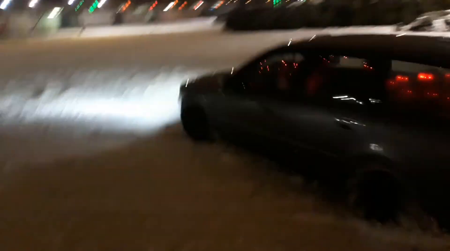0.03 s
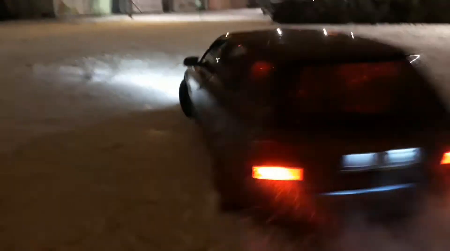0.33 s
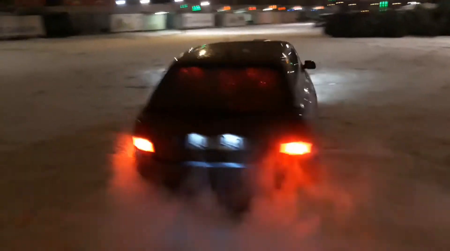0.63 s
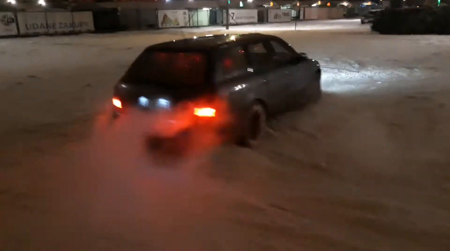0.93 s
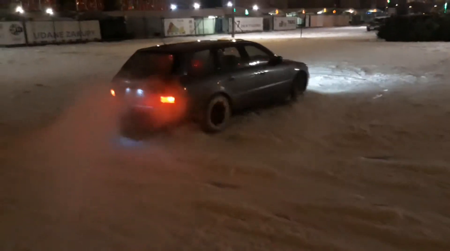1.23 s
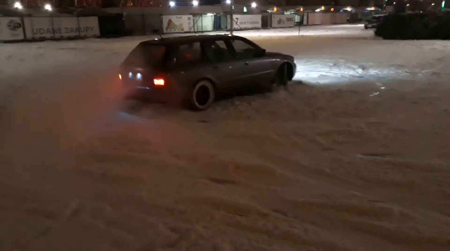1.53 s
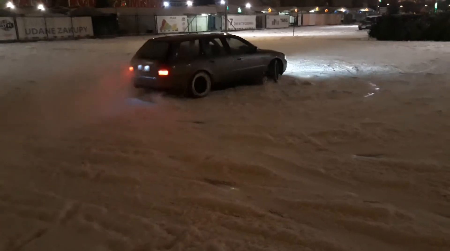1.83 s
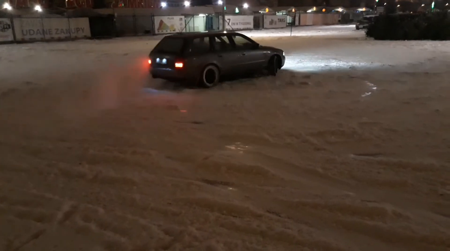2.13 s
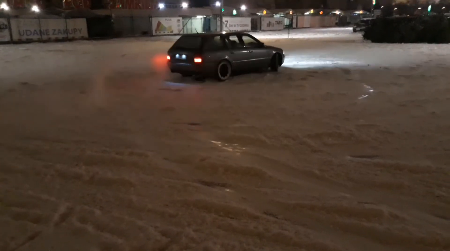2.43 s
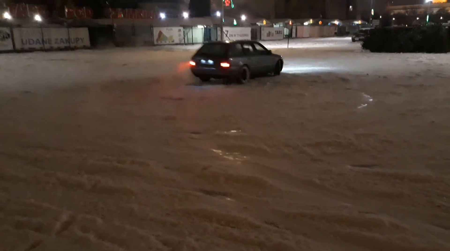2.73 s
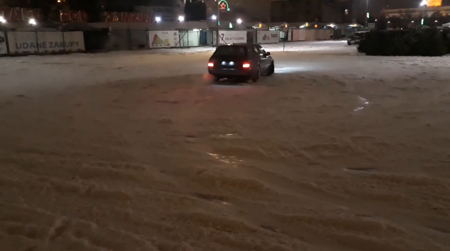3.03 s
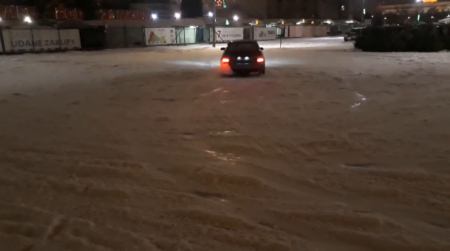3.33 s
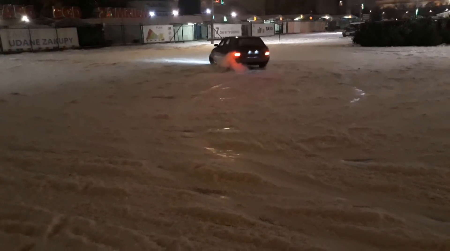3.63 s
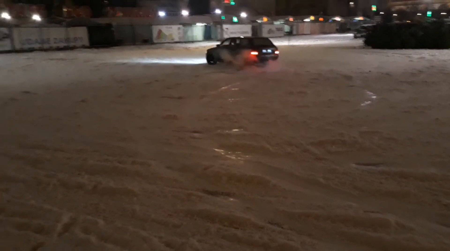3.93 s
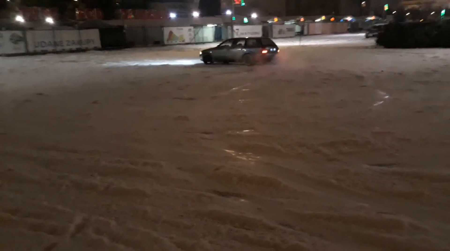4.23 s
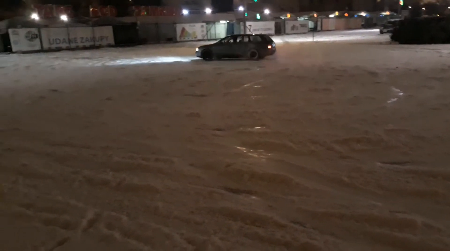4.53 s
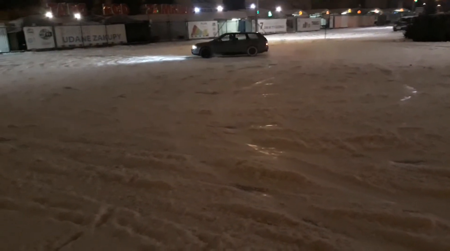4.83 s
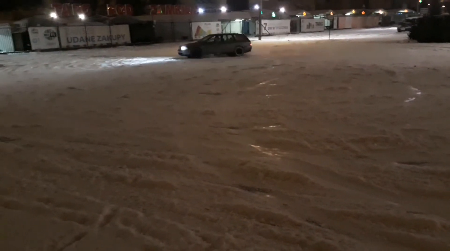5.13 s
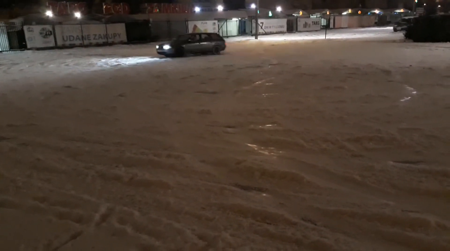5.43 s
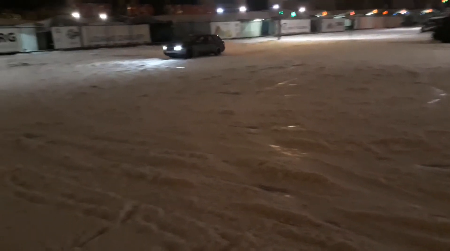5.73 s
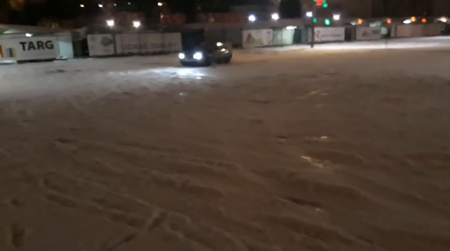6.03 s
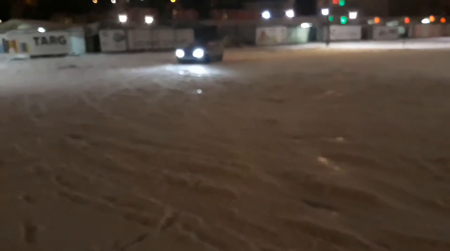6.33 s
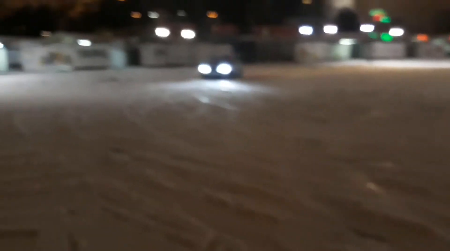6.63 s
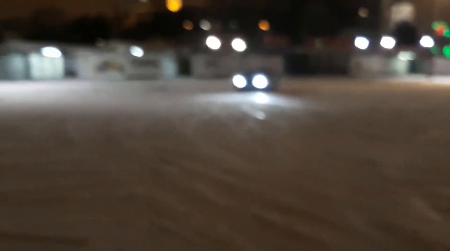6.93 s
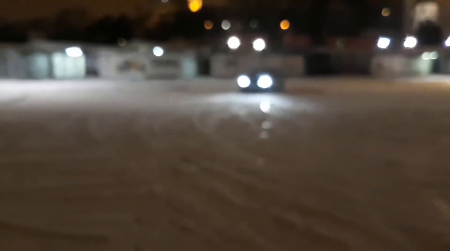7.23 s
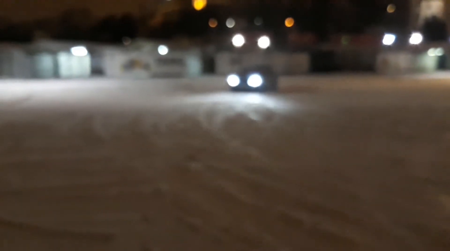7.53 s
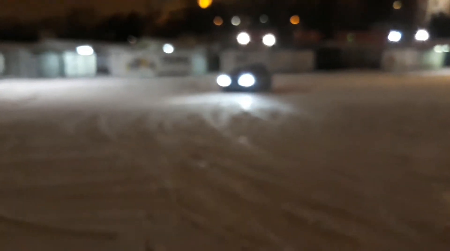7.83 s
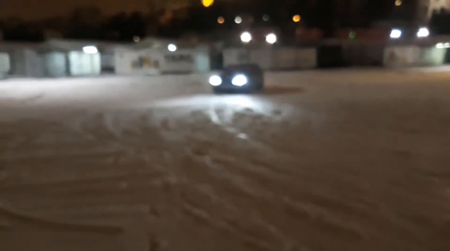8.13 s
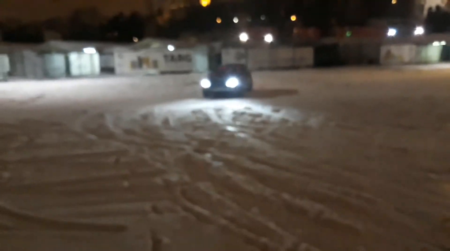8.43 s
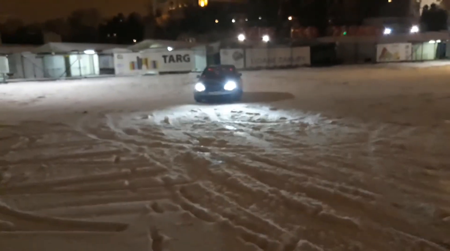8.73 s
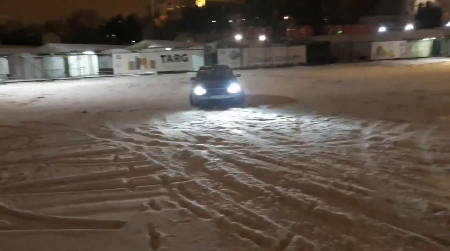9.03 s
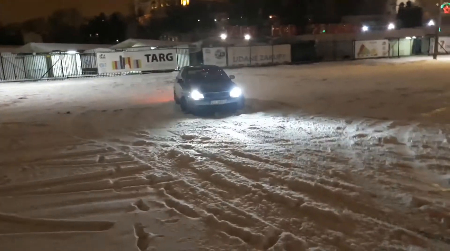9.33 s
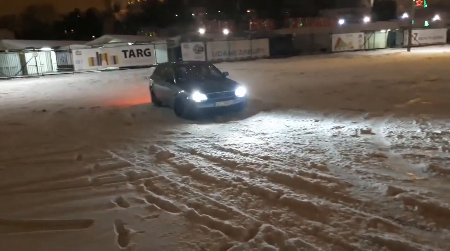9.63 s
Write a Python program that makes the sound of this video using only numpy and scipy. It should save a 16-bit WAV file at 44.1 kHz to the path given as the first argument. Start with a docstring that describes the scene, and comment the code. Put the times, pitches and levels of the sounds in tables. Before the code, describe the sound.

A car revs loudly close by, spins its tyres on snow, then moves off with exhaust pops and turns back in bursts of throttle.

```python
"""A snowy car park at night: an estate car pulls away close by, drifts, turns and comes back.
Four bursts of throttle set the revs. Uneven firings drone and rumble in the exhaust, gas roars in time
with them and the spinning tyres throw snow. A hard lump knocks on the underbody, unburnt fuel pops and
lumps of snow crunch. As the nose turns to us the engine bay hisses, and faint high whistling bands
glide up and down. Low buildings give a faint echo."""
import sys
import numpy as np
from scipy import signal
from scipy.fft import rfft, irfft
from scipy.io import wavfile

SR = 44100
rng = np.random.default_rng(int(sys.argv[2]) if len(sys.argv) > 2 else 0)


def master(y):
    """Save y as 16-bit WAV."""
    cut = np.clip(np.atleast_2d(y).T, -1, 1)
    pcm = np.round(cut * 32767)  # scale
    wavfile.write(sys.argv[1], SR, pcm.astype(np.int16))


N = 432180
TIME_S = np.arange(N) / SR


def undb(db):
    """Decibels to gain."""
    return np.exp(np.asarray(db) * (np.log(10) / 20))


def unit(x):
    """Scale to rms 1."""
    return x / np.sqrt(np.mean(x ** 2))


def curves(table):
    """Table columns, linearly interpolated over time."""
    times_s, *columns = np.transpose(table)
    return [np.interp(TIME_S, times_s, column) for column in columns]


def noise():
    """White noise."""
    return rng.standard_normal(N)


def walk(hz):
    """Smooth random drift, rms 1."""
    step = max(int(SR / (2 * hz)), 2)
    knots = rng.standard_normal(N // step + 2)[:, None]
    blend = np.sin(np.pi / 2 * np.arange(step) / step) ** 2
    return unit((knots[:-1] + np.diff(knots, axis=0) * blend).ravel()[:N])


def colour(x, spectrum):
    """Filter by (Hz, dB) points; rms 1."""
    hz, db = np.transpose(spectrum)
    bins_hz = np.arange(1, N // 2 + 2) * SR / N
    gain_db = np.interp(np.log(bins_hz), np.log(hz), db, left=-70, right=min(db[-1], 0))
    return unit(irfft(rfft(x) * undb(gain_db), N))


def ring(x, hz, width_hz):
    """One resonance, gain 1 at centre."""
    return signal.lfilter(*signal.iirpeak(min(hz, .45 * SR), hz / width_hz, SR), x)


def ring_twice(x, hz, width_hz):
    """Two equal resonances in series: steeper skirts."""
    return ring(ring(x, hz, width_hz), hz, width_hz)


def bump(x, centre, width, db):
    """Bell curve in x, db at centre."""
    return db / (1 + ((x - centre) / width) ** 2 / 2) ** 2


def puffs(turns, cycle_depth, firing_depth):
    """Noise throbbing with the two-turn engine cycle and with each firing."""
    return noise() * (1 + cycle_depth * np.cos(np.pi * turns) + firing_depth * np.cos(4 * np.pi * turns))


def grains(per_s, spread_db):
    """Sparse clicks of very unequal size, rms 1."""
    hit = rng.random(N) < per_s / SR
    return unit(hit * noise() * undb(spread_db * np.minimum(rng.exponential(size=N), 5)))


def follow(goal, rise_s, fall_s):
    """First-order lag of a stepped control."""
    out, value = np.empty(N), goal[0]
    edges = [0, *(np.flatnonzero(np.diff(goal)) + 1), N]
    for a, b in zip(edges, edges[1:]):
        lag_s = rise_s if goal[a] > value else fall_s
        out[a:b] = goal[a] + (value - goal[a]) * np.exp(-np.arange(b - a) / SR / lag_s)
        value = out[b - 1]
    return out


IDLE_HZ, FULL_HZ = 36.56, 100
# throttle bursts (opens [s], shuts [s], pedal held afterwards [0-1])
THROTTLE = [(-2, 1.87, 0), (3, 4.03, 0), (4.33, 5.19, .35), (5.5, 8.66, 0.01)]
# full-throttle revs on slipping tyres (time [s], crank rate [Hz])
WHEELSPIN = [(0, 96.6), (.22, 98.74), (.5, 96.6), (.7, 97.7), (1.42, 96.5), (1.75, 99.37), (3.45, 101),
             (3.9, 104.5), (4.8, 106.4), (5.15, 102.5), (5.95, 101.1), (6.65, 96.53), (7.55, 101.3),
             (8.55, 102.9)]
def drive():
    """Crank rate [Hz] and load [0-1] lag the pedal; revs run between idle and wheelspin."""
    pedal = np.zeros(N)
    for opens_s, shuts_s, held in THROTTLE:
        pedal[TIME_S >= opens_s] = 1
        pedal[TIME_S >= shuts_s] = held
    crank_hz = IDLE_HZ + (curves(WHEELSPIN)[0] - IDLE_HZ) * follow(pedal, rise_s=.29, fall_s=.45)
    return crank_hz, follow(pedal, rise_s=.13, fall_s=.13)


# side turned to us (time [s], facing [0 tail, 1 flank, 2 nose])
FACING = [(0, 0.49), (.22, 0.17), (.69, 0.22), (.93, 0.67), (1.9, 0.78), (3.3, 0.055), (4.1, 0.11),
          (4.5, 0.91), (5.6, 1.24), (6.25, 1.45), (6.9, 2)]
def heading():
    """Facing, and the view: weights of tail, flank and nose."""
    facing = curves(FACING)[0]
    return facing, np.clip(1 - abs(facing - np.arange(3)[:, None]), 0, 1)


# path of the car (time [s], distance [m])
DISTANCE = [(0, 2.74), (.42, 2.33), (1, 5), (1.8, 6.65), (3, 14.1), (3.5, 23.6), (3.9, 16), (4.3, 26),
            (4.85, 18.2), (5.4, 26.2), (6.2, 22), (6.9, 31.2), (8.5, 19.2), (9.8, 16.2)]
def doublings(near_m=2.6):
    """Doublings of distance beyond near_m."""
    return np.log2(curves(DISTANCE)[0] / near_m)


# layer balance; rows: hum, firing, rasp, rumble, roar, hiss
# (tail [dB], flank [dB], nose [dB], distance [dB/doubling], revs [dB/octave], throttle shut [dB])
LAYERS = [(-25, -24.7, -29.3, -3, 8.5, -6.5), (-15, -18.5, -21, -5, 10.5, -4.5),
          (-23.5, -24, -31.5, -3.5, 7, -3.5), (-28, -30, -32, -3, 1.2, 0.8),
          (-28.5, -27, -26.5, -4.5, 2, -2), (-38, -35, -35, -4, 4, -2)]
def levels(crank_hz, load, view):
    """Layer levels [dB] from view, distance, revs and load."""
    return np.array(LAYERS) @ np.vstack([view, doublings(), np.log2(crank_hz / FULL_HZ), 1 - load])


def tone(turns, order, db, dispersion=1.5):
    """One engine order; the pipe delays each differently, blending the firings into a drone."""
    phase = np.pi * (2 * order * turns - dispersion * order ** 2 + .062 * walk(2))
    return np.sqrt(2) * undb(db) * np.sin(phase)


# uneven firing (order [x crank rate], tail [dB], flank [dB], nose [dB]), relative to the hum
HALF_ORDERS = [(.5, -8, -15.5, -15.5), (1.5, -11, -20, 0)]
def boom(turns, hum_db, firing_db, view):
    """The silencer passes the lowest orders as near-pure tones, less steady with distance."""
    far = np.clip(doublings() / 3, 0, 1)
    waver_db = .8 + 1.2 * far
    orders = [(1, hum_db), (2, firing_db)]
    orders += [(order, hum_db + np.dot(side_db, view)) for order, *side_db in HALF_ORDERS]
    out = np.zeros(N)
    for order, db in orders:
        jitter_turns = .045 * far * walk(20) / (2 * order)
        out += tone(turns + jitter_turns, order, db + waver_db * walk(14))
    return out


def pipe_resonance(note, view, hz, width_hz, side_db):
    """Orders ring a resonance as they sweep through it; gain by tail, flank and nose."""
    return undb(side_db) @ view * ring_twice(note, hz, width_hz)


# upper exhaust orders (order [x crank rate], tail [dB], flank [dB], nose [dB])
RASP_ORDERS = [(2.5, -1.5, -3.5, -10.5), (3, -3, -7, -5), (3.5, -41, -1, -17), (4, -11, -3, -7.5),
               (4.5, -27, -18, -11.5), (5, -14.5, -12.5, -18), (5.5, -19, -12.5, -11),
               (6.5, -17.5, -17, -12), (7, -13.5, -15.5, -20), (8, -12.5, -17, -28)]
# tailpipe resonances (centre [Hz], width [Hz], tail [dB], flank [dB], nose [dB])
TAILPIPE = [(308.2, 29.7, 3, -18, -32), (652, 55, 9.2, -8, -11)]
def rasp(turns, view, rev_drop, load):
    """Unequal firings flutter the upper orders; the highest fade as revs drop and over distant snow."""
    snow_loss_db = .9 * doublings()
    note = np.zeros(N)
    for order, *side_db in RASP_ORDERS:
        jitter_turns = .0095 * walk(25)
        loss_db = 6 * rev_drop * (order - 2) + snow_loss_db * max(order - 7, 0)
        note += tone(turns + jitter_turns, order, np.dot(side_db, view) + 2.3 * walk(14) - loss_db)
    silencer = pipe_resonance(note, view, hz=210.5, width_hz=48, side_db=(-9, 5, 17))
    tailpipe = sum(pipe_resonance(note, view, hz, width_hz, db) for hz, width_hz, *db in TAILPIPE)
    return note + (1 - load) * silencer + tailpipe


# exhaust resonances (centre [Hz], width [Hz], level [dB])
PIPE_MODES = [(244, 89, 1.5), (664, 90, -8.5), (996, 140, -9)]
def growl(turns, bark=1.1):
    """Gas bursts ring the pipe; one firing per cycle barks louder."""
    gas = puffs(turns, 0, .5) * np.exp(bark * np.cos(np.pi * turns))
    return unit(sum(undb(db) * ring_twice(gas, hz, width_hz) for hz, width_hz, db in PIPE_MODES))


# rumble spectrum (frequency [Hz], level [dB])
RUMBLE_SPECTRUM = [(25, -34), (48, -7), (75, 1), (130, 5.5), (230, 5), (330, -1), (500, -33), (900, -66)]
def rumble(turns):
    """Ragged burning: low throbbing noise that remains off throttle."""
    return colour(puffs(turns, .3, .5) + .3 * grains(per_s=120, spread_db=2), RUMBLE_SPECTRUM)


# roar spectrum (frequency [Hz], level [dB])
ROAR_SPECTRUM = [(250, -2.5), (480, 0), (680, 2), (860, -0.5), (1250, -5), (1650, -7), (2100, -20.5),
                 (3000, -25), (5000, -50)]
def roar(turns):
    """Gas and churned snow roar in time with the firings."""
    churn = puffs(turns, .11, .14) + .37 * grains(per_s=1500, spread_db=2.2)
    return colour(churn, ROAR_SPECTRUM) * undb(.95 * walk(14))


# tyre hiss spectrum (frequency [Hz], level [dB])
TYRE_SPECTRUM = [(1200, -4.5), (2200, -1.5), (2900, -2), (4000, -5.5), (5400, -9.5), (6500, -17.5),
                 (7800, -11.5), (8800, -17), (9600, -44)]
def tyre_hiss(turns):
    """Spinning tyres hiss on grainy snow."""
    return colour(puffs(turns, .1, .063) + .29 * grains(per_s=3000, spread_db=2.5), TYRE_SPECTRUM)


# spray spectrum (frequency [Hz], level [dB])
SPRAY_SPECTRUM = [(7000, -29), (10000, 0), (11500, 4.5), (15000, 7)]
# spray envelope (time [s], level [dB])
SPRAY_LEVEL = [(.37, -51), (0.93, -58.5), (1.58, -56.5), (2.95, -86), (3.05, -64), (3.17, -79), (3.6, -76),
               (4.95, -57), (5.27, -65), (7.5, -74), (9.8, -74)]
def snow_spray():
    """Fine thrown snow fills the top treble."""
    spray = colour(noise() + .4 * grains(per_s=4000, spread_db=3), SPRAY_SPECTRUM)
    return spray * undb(curves(SPRAY_LEVEL)[0] + .97 * walk(12))


def tread():
    """Rolling tread steadily crunches packed snow."""
    crunch = ring(grains(per_s=1200, spread_db=1.2), hz=1930, width_hz=1000)
    return unit(ring(crunch, hz=1880, width_hz=1000)) * undb(-55 + 2 * walk(6.7))


# ground notch (time [s], centre [Hz], share removed [0-1])
SNOW_NOTCH = [(.5, 490, 0.45), (1, 506, 0.1), (3.4, 479.8, .1), (4.75, 394.5, 0.33), (5.1, 423, 0.13),
              (5.65, 495.7, 0.79), (6.6, 590, 0.55), (7.2, 880, .35)]
def snow_bounce(x, width_hz=150):
    """The bounce off the snow cancels a band that slides as the car moves."""
    hz, share = curves(SNOW_NOTCH)
    carrier = np.exp(2j * np.pi * np.cumsum(hz) / SR)
    pole = np.exp(-np.pi * width_hz / SR)
    band = 2 * np.real(carrier * signal.lfilter([1 - pole], [1, -pole], x / carrier))
    return x - share * band


def building_echo(x, t60_s=.45, gap_s=.069):
    """Thin, dull echo off the surrounding fronts."""
    t = np.arange(SR) / SR
    tail = ring(rng.standard_normal(SR), hz=534, width_hz=1800) * undb(-60 * t / t60_s) * (t > gap_s)
    return signal.fftconvolve(x, tail / np.sqrt(np.sum(tail ** 2)))[:N]


# blows on the underbody (time [s], level [dB])
KNOCKS = [(1.399, -19.5), (1.4073, -18), (1.4215, -21)]
# panel modes (frequency [Hz], level [dB], t60 [s])
UNDERBODY_MODES = [(590, -5.5, .07), (816, 0.5, 0.047), (1097, -0.5, 0.042), (1740, -12, 0.056)]
def knocks(crack_db=-7, crack_s=.0035):
    """A hard lump strikes three times; each blow cracks and rings the panel."""
    out = np.zeros(N)
    t = np.arange(SR // 4) / SR
    panel = sum(undb(db - 60 * t / t60) * np.sin(2 * np.pi * hz * t) for hz, db, t60 in UNDERBODY_MODES)
    for time_s, db in KNOCKS:
        burst = unit(ring_twice(rng.standard_normal(len(t)), hz=2200, width_hz=900))
        crack = undb(crack_db) * burst * np.exp(-t / crack_s)
        out[int(time_s * SR) + np.arange(len(t))] += undb(db) * (panel + crack)
    return out


# exhaust pops (time [s], level [dB], pitch [Hz])
POPS = [(2.473, -17, 150), (2.886, -23, 140), (3.041, -23, 110), (3.187, -16, 135), (3.234, -14.5, 170),
        (3.767, -18, 170), (3.906, -16, 160), (3.925, -11.5, 145), (4.209, -17.5, 200), (4.261, -20, 160),
        (4.412, -22, 150), (5.3855, -10, 260)]
def pops():
    """Unburnt fuel goes off in the silencer: short round thumps."""
    out = np.zeros(N)
    for time_s, db, hz in POPS:
        span = int(time_s * SR) + np.arange(-1000, 1000)
        phase = 2 * np.pi * hz * (span / SR - time_s)
        out[span] -= undb(db) * np.cos(phase - .3) * np.exp(-(phase / np.pi) ** 2)
    return out


# snow lumps (time [s], level [dB], centre [Hz], width [Hz], envelope sigma [s])
CRUNCHES = [(2.829, -36, 377, 380, .009), (3.89, -39, 1100, 895, 0.017), (5.838, -37, 850, 600, 0.0053),
            (9.33, -37.5, 550, 598, .02), (9.72, -40, 900, 900, .025)]
def crunches():
    """Each crushed or flung lump breaks into a short swarm of grains."""
    out = np.zeros(N)
    swarm = grains(per_s=5000, spread_db=2.7)
    for time_s, db, hz, width_hz, sigma_s in CRUNCHES:
        span = np.arange(int((time_s - .2) * SR), min(int((time_s + .2) * SR), N))
        swell = np.exp(-.5 * ((span / SR - time_s) / sigma_s) ** 2)
        out[span] += undb(db) * swell * unit(ring_twice(swarm[span], hz, width_hz))
    return out


# engine bay hiss spectrum (frequency [Hz], level [dB])
BAY_SPECTRUM = [(1200, 6), (1750, -9), (2200, -10), (2700, 0), (4000, -3), (5200, -4.5), (6400, -13.5),
                (7800, -7), (8700, -12), (9600, -22)]
def bay_hiss(turns):
    """The engine bay hisses, throbbing with the firings."""
    return colour(puffs(turns, .1, .068), BAY_SPECTRUM)


def strand(hz, spread_hz):
    """Narrow noise band around a gliding pitch, rms 1."""
    phase = 2 * np.pi * np.cumsum(hz) / SR
    return walk(spread_hz) * np.sin(phase) + walk(spread_hz) * np.cos(phase)


# whine glide (time [s], pitch [Hz], level [dB])
WHINE = [(5.95, 2590, -6), (6.4, 2690, -2), (6.55, 2563, -6), (7.15, 2631, -4), (7.45, 2520, -7.5),
         (8.6, 2678, -5)]
# whine partials (ratio [x pitch], level [dB])
WHINE_PARTS = [(.48, -3), (.667, -3.5), (1, -1), (1.51, -9.5)]
def whine(flutter_db=2.5):
    """A fluttering whine comes in surges, each rising a little."""
    hz, level_db = curves(WHINE)
    bands = sum(undb(db) * strand(ratio * hz, spread_hz=95) for ratio, db in WHINE_PARTS)
    return undb(level_db + flutter_db * walk(11)) * bands


# whistle glide (time [s], pitch [Hz], level [dB])
WHISTLE = [(5.35, 4850, -27), (5.6, 4960, -3.5), (6.1, 5170, -4.5), (6.5, 4750, -11), (6.9, 4202, -16),
           (7.6, 4917, -10.5), (8.5, 5410, -17)]
# whistle bands (ratio [x pitch], level [dB], spread [Hz])
WHISTLE_BANDS = [(.93, -3.5, 170.2), (1, 0, 140.3), (1.5, -3, 380)]
def whistle():
    """Faint high whistling bands glide up and down as the car turns towards us."""
    hz, level_db = curves(WHISTLE)
    bands = sum(undb(db) * strand(ratio * hz, spread_hz) for ratio, db, spread_hz in WHISTLE_BANDS)
    return undb(level_db) * (bands - ring(bands, hz=6700, width_hz=1600))


# howl glide (time [s], pitch [Hz], level [dB])
HOWL = [(5.6, 660, -21), (6.3, 746.8, 9), (6.75, 798, -27)]
def howl():
    """A low howl rises as the nose swings round."""
    hz, level_db = curves(HOWL)
    return undb(level_db) * strand(hz, spread_hz=45)


def scene():
    """Throttle drives the engine layers; distance and facing set their balance."""
    crank_hz, load = drive()
    turns = np.cumsum(crank_hz * (1 + .0023 * walk(18))) / SR
    rev_drop = np.clip(1 - crank_hz / FULL_HZ, 0, 1)
    facing, view = heading()
    tail, flank, nose = view
    front_share = np.sqrt(nose)

    hum_db, firing_db, rasp_db, rumble_db, roar_db, hiss_db = levels(crank_hz, load, view)
    # low tones cancel at slanting angles
    hum_db += bump(facing, centre=1.503, width=.098, db=-12.5)
    firing_db += bump(facing, centre=.52, width=.18, db=-13)
    hum_db += np.sqrt(load) * bump(crank_hz, centre=60, width=9, db=10)  # pipe booms at low revs
    firing_db += (1 - nose) * bump(2 * crank_hz, centre=195, width=7.7, db=6)  # pipe's own note
    hiss_db += bump(TIME_S, centre=3.45, width=.18, db=-3.5)  # the hiss dips briefly

    car = rumble(turns) * undb(rumble_db)
    car += rasp(turns, view, rev_drop, load) * undb(rasp_db)
    car += growl(turns) * (tail + .37 * flank) * undb(rasp_db - 4.5)
    car += roar(turns) * undb(roar_db)
    rear = tyre_hiss(turns)
    front = bay_hiss(turns) + (1 - rev_drop) * (whistle() + whine() + howl())
    hiss = np.sqrt(1 - front_share) * rear + np.sqrt(front_share) * front
    car += hiss * undb(hiss_db + .59 * walk(8))
    car += snow_spray() + tread() + boom(turns, hum_db, firing_db, view)
    direct = snow_bounce(car) + pops() + crunches() + knocks()
    return (direct + undb(-21) * building_echo(direct))[None]


def record(dry):
    """Cut the deepest bass and the top treble."""
    low_cut = signal.butter(6, 41.6, "high", fs=SR, output="sos")
    high_cut = signal.ellip(10, .2, 80, 15750, fs=SR, output="sos")
    return signal.sosfilt(high_cut, signal.sosfilt(low_cut, dry))


dry = scene()
out = record(dry)
master(out)
```